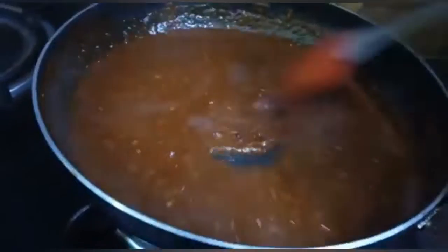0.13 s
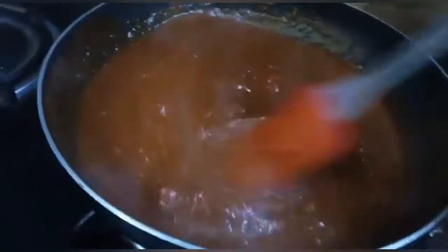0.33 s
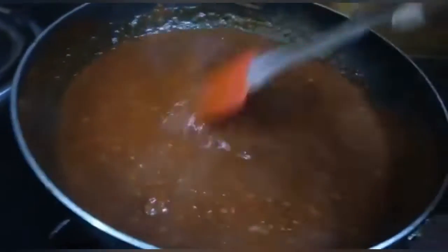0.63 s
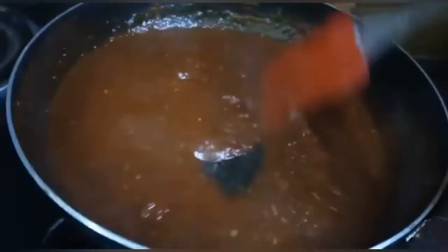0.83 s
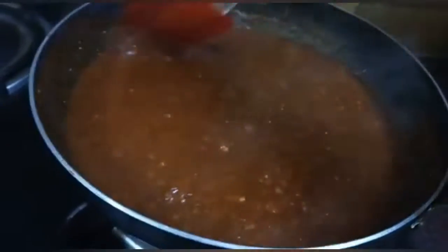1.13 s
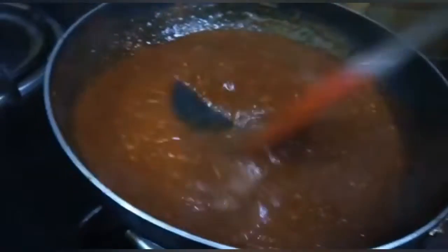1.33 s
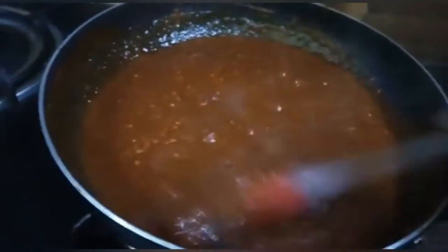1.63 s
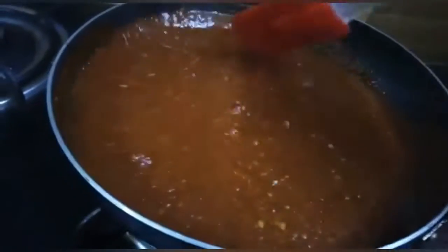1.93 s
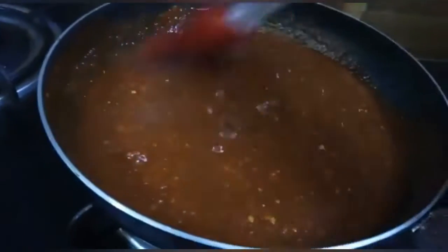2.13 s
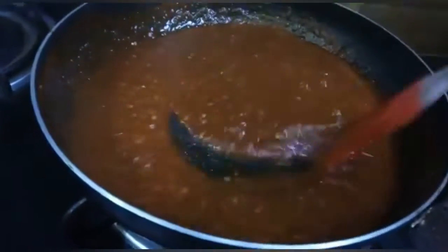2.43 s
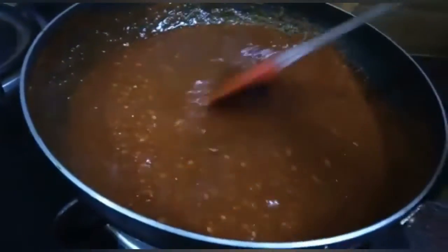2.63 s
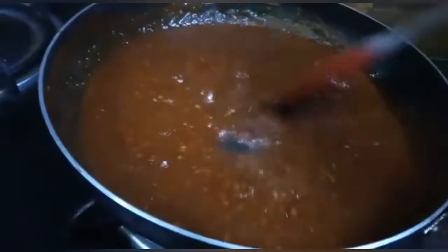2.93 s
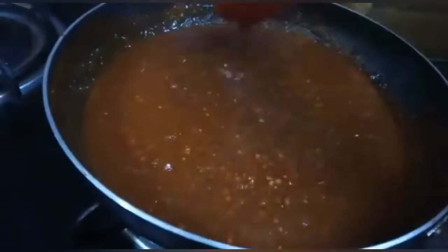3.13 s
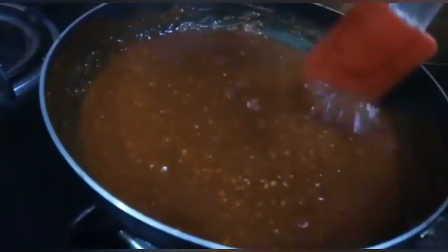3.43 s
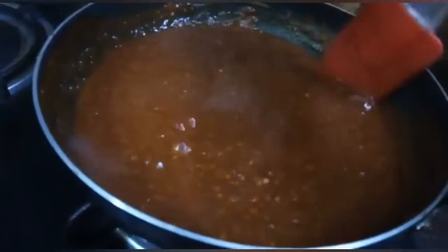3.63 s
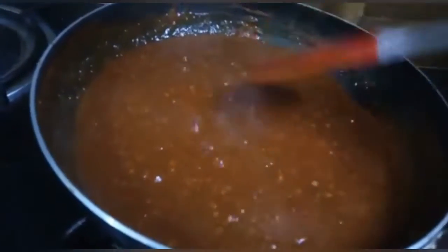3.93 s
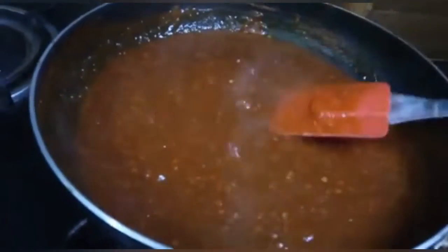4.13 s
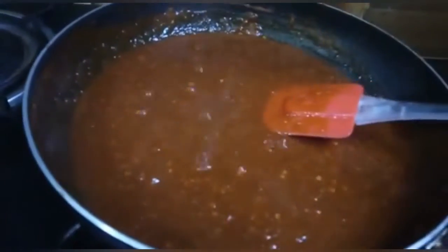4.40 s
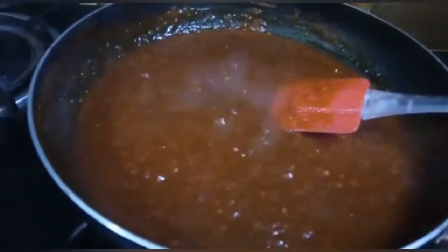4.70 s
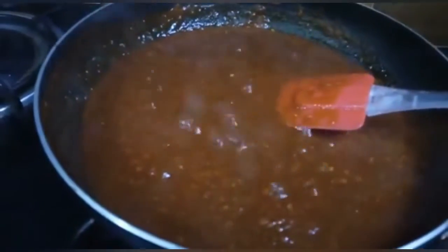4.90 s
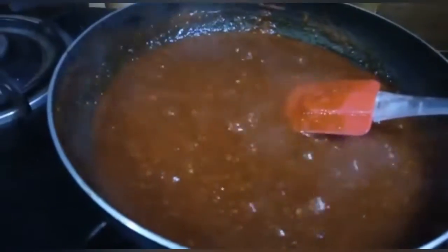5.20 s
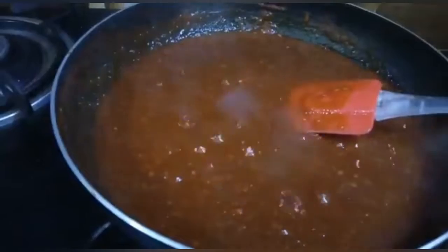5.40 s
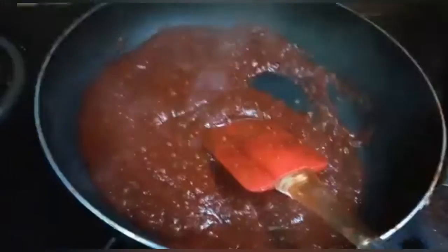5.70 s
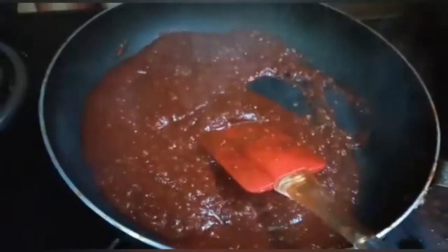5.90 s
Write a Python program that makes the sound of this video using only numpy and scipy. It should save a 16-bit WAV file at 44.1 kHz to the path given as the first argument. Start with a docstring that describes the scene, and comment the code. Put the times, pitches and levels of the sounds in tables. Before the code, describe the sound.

A close, mono, bass-thin sound of cooking with a dull top. Low rubbing rumbles and irregular ringing pan knocks come first, mixed with clumped sizzling and tiny steam squeals. Stirring eases, and the sauce seethes and spits harder, one pop standing out strongly. After an abrupt momentary dropout, the spatula bumps the pan and reduced sauce crackles finely, with a short indoor reflection around everything.

```python
"""Chutney in a frying pan

Thick chutney bubbles and sizzles over a gas flame in a small kitchen: clumped noise bursts over steady hiss.
Brisk spatula strokes rumble and rock the pan, whose ringing modes knock on the burner grate.
Then the spatula rests and the sauce boils and spits, with squealing steam jets and hollow bubble notes.
After a short silence the sauce is heard reduced, with a drier, sparser crackle."""
import sys
import numpy as np
from scipy import signal
from scipy.fft import rfft, irfft
from scipy.io import wavfile

SR = 44100
rng = np.random.default_rng(int(sys.argv[2]) if len(sys.argv) > 2 else 0)


def generate_wav(sig):
    """Save sig (samples, or channels by samples) to the path in sys.argv[1] as 16-bit PCM at SR."""
    pcm = np.round(np.clip(np.atleast_2d(sig).T, -1, 1) * 32767).astype(np.int16)
    wavfile.write(sys.argv[1], SR, pcm)


N = 266893
TIME = np.arange(N) / SR
SILENCE_START_S, SILENCE_END_S = 5.503, 5.579


def from_db(db):
    """Decibels to gain."""
    return 10 ** (np.asarray(db) / 20)


def rms_one(x):
    """Scale to rms 1."""
    return x / np.sqrt(np.mean(x ** 2) + 1e-20)


def at_hz(points, hz):
    """Read a table on a log-frequency axis."""
    table_hz, values = np.transpose(points)
    return np.interp(np.log(hz), np.log(table_hz), values)


def passed(x, hz, kind, order=2):
    """Butterworth filter."""
    return signal.sosfilt(signal.butter(order, hz, kind, fs=SR, output="sos"), x + 1e-18)


def drift(per_s):
    """Smooth chance with spread 1, heading for a new random value per_s times a second."""
    knots = rng.standard_normal(int(per_s * N / SR) + 2)
    return rms_one(np.interp(TIME * per_s, np.arange(len(knots)), knots))


def ring(x, hz, t60):
    """Resonator: a unit click sets a sine of height 1 ringing, 60 dB down after t60 seconds."""
    radius = from_db(-60 / (t60 * SR))
    angle = 2 * np.pi * hz / SR
    return signal.lfilter([0, np.sin(angle)], [1, -2 * radius * np.cos(angle), radius ** 2], x + 1e-18)


def fade(t, t60):
    """Exponential decay, 60 dB down after t60 seconds."""
    return np.exp(-np.log(1000) * t / t60)


def swell(start, end, attack, release):
    """Rise towards start, hold until end, then fall away."""
    before = np.maximum(start - TIME, 0) / attack
    after = np.maximum(TIME - end, 0) / release
    return np.exp(-before ** 2 - after ** 2)


def add(track, s, sound):
    """Mix a sound in at time s."""
    at = max(round(s * SR), 0)
    track[at:at + len(sound)] += sound[:N - at]


def thirds(spectrum):
    """Third-octave bands over a spectrum: (low edge, high edge, centre, gain)."""
    half_band = 2 ** (1 / 6)
    centres = 1000 * 2 ** (np.arange(-15, 10) / 3)
    inside = centres[(centres >= spectrum[0][0]) & (centres <= spectrum[-1][0] * half_band)]
    return [(hz / half_band, hz * half_band, hz, from_db(at_hz(spectrum, hz))) for hz in inside]


def coloured_noise(spectrum, t, t60s=None):
    """Noise of rms 1 in bands, each dying at its own pace if decay times are given."""
    out = 0
    for low, high, hz, gain in thirds(spectrum):
        band = gain * passed(rng.standard_normal(len(t)), [low, high], "band")
        if t60s is not None:
            band = band * fade(t, at_hz(t60s, hz))
        out = out + band
    return rms_one(out)


def coloured(x, spectrum, size=2048):
    """Give a sound a spectrum through a causal (minimum-phase) filter."""
    hz = np.fft.rfftfreq(size, 1 / SR) + 1   # +1 keeps the logarithm finite
    cepstrum = irfft(np.log(from_db(at_hz(spectrum, hz))))
    # folding the cepstrum forward makes the filter minimum-phase
    cepstrum[1:size // 2] *= 2
    cepstrum[size // 2 + 1:] = 0
    return signal.fftconvolve(x, irfft(np.exp(rfft(cepstrum))))[:len(x)]


def gas_flame(level_db=-71.5):
    """The burning gas is turbulent: steady coloured noise."""
    # colour of the flame: (frequency [Hz], relative level [dB per Hz])
    flame_colour = [(40, -5.5), (100, 0), (180, 0), (300, -11.5), (800, -8), (2500, -7.5), (8000, -25.5)]
    return from_db(level_db) * coloured_noise(flame_colour, TIME)


def drag(boom_hz=106):
    """Rubbing shakes the pan and keeps the stove top booming at its lowest mode; the boil does so faintly."""
    # spells of stirring: (start [s], end [s], rumble level [dB])
    stirs = [(0, 0.363, -59.5), (0.696, 0.994, -66), (1.186, 1.33, -64.5), (1.614, 1.921, -60),
             (2.38, 2.723, -70), (5.597, 5.64, -68)]
    # colour of the rumble: (frequency [Hz], relative level [dB per Hz])
    rumble_colour = [(30, -31.5), (60, -10.5), (105, -5), (140, -6), (185, 5.5), (240, -15.5), (330, 4.5),
                     (600, -20), (1200, -18)]
    attack_s, release_s = .05, 0.052
    resting = from_db(-76.5)   # the boil alone shakes the pan
    stirring_boom_db, resting_boom_db = -.5, -9.5   # relative to the rumble

    spells = [from_db(db) * swell(start, end, attack_s, release_s) for start, end, db in stirs]
    stirring = np.max(spells, axis=0)
    rumble = np.hypot(stirring, resting) * coloured_noise(rumble_colour, TIME)

    boom = rms_one(ring(rng.standard_normal(N), boom_hz, t60=.45))
    full_pan = TIME < SILENCE_START_S   # stirring the reduced sauce adds no boom
    stirring_boom = from_db(stirring_boom_db) * stirring * full_pan
    resting_boom = from_db(resting_boom_db) * resting
    return rumble + (stirring_boom + resting_boom) * boom


def tear(hz, width, t60):
    """A film of sauce rips: a brief rush of air, loudest around the pitch of its cavity."""
    t = TIME[:SR // 20]
    edges = [hz / (1 + width), min(hz * (1 + width), SR / 3)]
    return passed(rng.standard_normal(len(t)) * fade(t, t60), edges, "band", order=1)


def bursts(per_s, spectrum, low_hz, high_hz, width, top_t60, spread_db, count=200):
    """Steam pockets burst in clumps, a few large among many small, each dealt one of many random tears."""
    clump_db = 3.3   # spread of the burst rate around per_s
    chance = rng.random(N)
    born = np.flatnonzero(chance < per_s * from_db(clump_db * drift(70)) / SR)

    size = np.minimum(rng.exponential(1, N), 3.6)
    sign = rng.choice([-1, 1], N)
    heights = from_db(spread_db * size) * sign / np.sqrt(per_s)   # a faster rate is no louder by itself

    shapes = []
    for hz in np.geomspace(low_hz, high_hz, count):
        t60 = top_t60 * (high_hz / hz) ** 0.32   # lower cavities last longer
        shapes.append(np.sqrt(hz) * rms_one(tear(hz, width, t60)))
    dealt = rng.integers(0, count, N)

    out = np.zeros(N)
    for i in born:
        add(out, i / SR, heights[i] * shapes[dealt[i]])
    return rms_one(coloured(out, spectrum))


def sauce(bubbling_trim_db=-0.5, sizzle_trim_db=1.0):
    """Large pockets burst in the depth of the sauce, tiny ones fizz at its edge; reduced sauce mostly crackles."""
    # vigour of the boil, which lulls where fresh sauce covers the hot metal:
    # (time [s], bubbling level before trim [dB], sizzle level before trim [dB])
    boil = [(0, -54, -61.5), (.22, -61, -73), (.42, -55.5, -58.5), (.85, -63, -68.5), (1.05, -63.5, -64),
            (1.5, -60.5, -62), (1.7, -54, -57.5), (1.93, -58.5, -60), (2.02, -70.5, -68), (2.13, -62, -60),
            (2.7, -57, -60.5), (2.96, -58.5, -60.5), (3.08, -71, -66), (3.15, -58.5, -60.5),
            (3.75, -59, -60), (4.1, -58.5, -58), (4.85, -54.5, -56), (5.5, -57, -57)]
    # a raft of bubbles collapses in one surge: (time [s], peak level before trims [dB])
    surges = [(1.123, -59), (1.196, -57), (2.08, -56), (2.234, -53.5), (2.445, -55), (2.514, -54),
              (2.885, -60.5), (3.214, -57.5), (3.35, -55.5), (3.544, -57.5), (3.664, -50), (3.83, -49),
              (3.99, -52), (4.166, -54), (4.27, -58), (4.441, -55), (4.601, -54), (4.92, -53),
              (5.06, -56.5), (5.169, -58), (5.28, -54), (5.385, -52.5), (5.598, -52), (5.69, -53),
              (5.77, -52), (5.91, -55), (5.975, -55)]
    # colours of the bursts, the last for reduced sauce: (frequency [Hz], relative level [dB per Hz])
    bubbling_colour = [(120, -30.5), (260, -16), (370, 1.5), (520, -7), (800, 3.5), (1000, -0.5), (1250, 3),
                       (1800, -4), (2500, 1), (3300, -8.5), (4500, -16.5), (8000, -14.5)]
    sizzle_colour = [(1000, -24), (2000, -18), (3000, -14), (4000, -3.5), (5200, 0.5), (6600, 3),
                     (8000, -5.5)]
    crackle_colour = [(600, -18), (1500, -13), (2300, -3), (3000, -4.5), (4200, 2.5), (5500, 3), (8000, -2)]
    surge_attack_s, surge_release_s, surge_sizzle_db = 0.016, 0.038, -3
    pops_per_s, fizz_per_s, rate_at_db = 1200, 1504, -55   # rates at that bubbling level, before clumping
    rate_follows = .4   # share of the bubbling level's swing that the rates follow
    reduced_db, reduced_per_s = -59, 700   # crackle between surges
    dies_db_per_s = 166   # the bubbling, once the sauce is reduced

    boil_s, bubbling_db, sizzle_db = np.transpose(boil)
    bubbling = np.interp(TIME, boil_s, bubbling_db)
    sizzle = np.interp(TIME, boil_s, sizzle_db)
    rate = from_db(rate_follows * (bubbling - rate_at_db))
    surge = sum(from_db(db) * swell(s, s, surge_attack_s, surge_release_s) for s, db in surges)

    pops = bursts(pops_per_s * rate, bubbling_colour, low_hz=460, high_hz=3480,
                  width=1.2, top_t60=0.0079, spread_db=5.0)
    fizz = bursts(fizz_per_s * rate, sizzle_colour, low_hz=2800, high_hz=6750,
                  width=0.19, top_t60=0.0082, spread_db=5.5)
    crackle = bursts(reduced_per_s, crackle_colour, low_hz=1850, high_hz=6900,
                     width=0.42, top_t60=0.003, spread_db=4.5)

    drying_db = dies_db_per_s * np.maximum(TIME - SILENCE_END_S, 0)
    pops = pops * np.hypot(from_db(bubbling), surge) * from_db(bubbling_trim_db - drying_db)
    sizzle_surge = from_db(surge_sizzle_db) * surge
    fizz = fizz * np.hypot(from_db(sizzle), sizzle_surge) * from_db(sizzle_trim_db)
    crackle = crackle * np.hypot(from_db(reduced_db), surge)
    return pops + np.where(TIME < SILENCE_END_S, fizz, crackle)


def knocks(modes_db=-6.5, grate_db=-5.5, crack_db=13.0, click_db=17.0, thud_hz=640, tick_hz=3300):
    """Iron meets the pan, which touches down a second time; soft landings thud, hard ones clang and tick."""
    # pan knocks on the grate: (time [s], thud gain [dB], clang gain [dB], tick gain [dB], second contact delay
    # [s], second contact relative level [dB])
    landings = [(0.0923, -33.5, -38, -36, 0.024, -7.5), (0.2604, -35.5, -33.5, -37, 0.0083, -8.5),
                (0.4593, -32, -41, -35.5, 0.0086, 0.5), (0.6719, -37, -36.5, -39, 0.0089, -6.5),
                (0.8961, -34.5, -49, -43, 0.021, -4.5), (1.3061, -45, -60.5, -55, 0.023, -8.5),
                (1.5597, -34.5, -30.5, -32, .014, -7), (1.7830, -35, -45.5, -42, 0.02, -5.5),
                (2.3168, -46, -82, -73, 0.022, -4)]
    # modes of the pan on the stove: (frequency before loading [Hz], relative level [dB], t60 [s])
    pan_modes = [(106.9, -5.5, 0.71), (185, -5.5, 0.4), (252, -0.5, 0.032), (295.2, 7, 0.11),
                 (322.8, -3.5, 0.32), (432, -2.5, 0.089), (612, 2, 0.25), (740, -1.5, 0.12),
                 (983, 7, 0.095), (1102, -7.5, 0.077), (1194, -2.5, 0.18), (1303, -7.5, 0.071),
                 (1388, 6.5, 0.038), (1540, -2.5, 0.18), (2030, -20, 0.14), (2244, -12, 0.2),
                 (2449, 4.5, 0.049), (2660, -4, 0.11), (2700, -3, 0.1), (2930, -7, 0.18), (3425, -18, 0.14),
                 (4570, -15.5, 0.047), (5810, 3.5, 0.041)]
    # dense ring of the grate and hob: (frequency [Hz], relative level [dB per Hz])
    grate_colour = [(63, -15.5), (160, -1), (290, 9.5), (440, -4.5), (520, -3), (700, -4), (1000, -3.5),
                    (1800, -16.5), (2500, -12), (4200, -26), (6000, -17), (8000, -28.5)]
    # its decay: (frequency [Hz], t60 [s])
    grate_t60s = [(80, 0.54), (210, 0.12), (560, 0.24), (1470, 0.25), (3880, 0.34), (7500, 0.16)]

    out, t = np.zeros(N), TIME[:SR]
    for s, thud, clang, tick, after, second_contact_db in landings:
        # the sauce lies differently at every knock and loads each mode a little differently
        loads = 1 + 0.0034 * rng.standard_normal(len(pan_modes))
        rings = np.array([from_db(db) * np.sin(2 * np.pi * hz * load * t) * fade(t, t60)
                          for (hz, db, t60), load in zip(pan_modes, loads)])
        # the second contact carries little of the pan's weight
        for delay, contact_db, weight in ((0, 0, 1), (after, second_contact_db, .35)):
            strengths = from_db(rng.normal(0, 1, len(pan_modes))) * rng.choice([-1, 1], len(pan_modes))
            modes = strengths @ rings
            click = from_db(click_db) * np.cos(2 * np.pi * tick_hz * t) * fade(t, 0.000099)
            scrape = passed(rng.standard_normal(len(t)), [450, 4000], "band", order=1)
            crack = from_db(crack_db) * scrape * fade(t, .022)
            grate = coloured_noise(grate_colour, t, grate_t60s) * np.sqrt(.045)   # rms about 1 over 20 ms
            hit = from_db(modes_db) * modes + from_db(grate_db) * grate + crack + click

            low = weight * from_db(thud) * passed(hit, thud_hz, "low")
            middle = from_db(clang) * passed(hit, [thud_hz, tick_hz], "band")
            high = from_db(tick) * passed(hit, tick_hz, "high")
            # the middle is flipped so that neighbouring bands do not cancel where they cross
            add(out, s + delay, from_db(contact_db) * (low - middle + high))
    return out


def jets(waver=0.013, flutter_hz=210, flutter=0.52, hiss_db=-2.5):
    """Steam forces a narrow way out from under the sauce, whose edge flutters: a rough squeal plus hiss."""
    # wet sauce meets bare hot metal and a steam jet squeals:
    # (time [s], squeal level before its envelope [dB], nominal length [s], mean pitch [Hz])
    squeals = [(0.145, -49.5, 0.017, 4980), (0.545, -49.5, 0.016, 5280), (2.434, -54.5, 0.024, 5340),
               (2.575, -46.5, 0.037, 5070), (2.838, -48.5, 0.019, 5170), (2.859, -48, 0.02, 4870),
               (2.981, -48.5, 0.019, 4750), (2.988, -54, 0.036, 5240)]
    out, t = np.zeros(N), TIME[:SR // 5]
    opening = 1 + flutter * np.sin(2 * np.pi * flutter_hz * t)
    for s, db, length, hz in squeals:
        age = t / length
        pitch = hz * (1 + waver * drift(900)[:len(age)])
        squeal = rms_one(opening * np.sin(2 * np.pi * np.cumsum(pitch) / SR))
        hiss = rms_one(passed(rng.standard_normal(len(age)), [4600, 7200], "band"))
        envelope = np.minimum(age * 5, 1) * np.exp(-age ** 4)
        add(out, s, from_db(db) * (squeal + from_db(hiss_db) * hiss) * envelope)
    return out


def spits(width=0.45, spray_db=-6.5, spray_t60=0.031, low_hz=550):
    """A big bubble snaps open and a longer, fine spray sounds with it."""
    # single loud spits: (time [s], peak level [dB], centre [Hz])
    loud_spits = [(1.001, -37.5, 970), (1.0432, -38.5, 1000), (1.165, -41, 2350), (1.194, -36, 1470),
                  (1.215, -38, 1600), (1.4634, -40, 6020), (1.657, -30, 2400), (1.7031, -25, 6000),
                  (1.9758, -39, 6800), (2.522, -33, 2690), (2.793, -37.5, 2380), (2.897, -33, 2560),
                  (3.282, -31, 2500), (3.356, -37, 1580), (3.4265, -37, 1100), (3.546, -40.5, 1970),
                  (3.653, -38.5, 885), (3.673, -31.5, 3000), (4.011, -23.5, 1500), (4.44, -42.5, 1400),
                  (4.7653, -32.5, 6100), (4.8235, -31.5, 1210), (4.927, -34.5, 1450), (4.977, -35, 1650),
                  (5.08, -39, 1090), (5.3652, -38.5, 1900), (5.477, -37, 1450), (5.703, -41.5, 4300),
                  (5.760, -41, 4670), (5.851, -36, 4340), (5.8886, -35.5, 4500), (5.927, -38, 3580),
                  (5.971, -41.5, 2250)]
    out = np.zeros(N)
    for s, peak_db, hz in loud_spits:
        snap = tear(hz, width, t60=.007)
        spray = from_db(spray_db) * tear(hz, width, spray_t60)
        pop = passed(snap + spray, low_hz, "high")
        add(out, s, from_db(peak_db) * pop / np.abs(pop).max())
    return out


def plops(rise=0.36):
    """The note of an opening bubble climbs a little as its cavity shrinks."""
    # big slow bubbles open with a hollow note: (time [s], peak level [dB], starting pitch [Hz], t60 [s])
    hollow_notes = [(3.377, -47, 592, 0.055), (3.424, -35.5, 1190, 0.027), (3.507, -53, 436, 0.096),
                    (4.011, -48, 548, 0.12), (4.195, -55, 540, 0.46), (4.285, -60, 537, 0.29)]
    out, t = np.zeros(N), TIME[:SR // 4]
    for s, db, hz, t60 in hollow_notes:
        cycles = hz * t * (1 + rise * t)   # pitch climbs by 2 * rise of itself per second
        add(out, s, from_db(db) * np.sin(2 * np.pi * cycles) * fade(t, t60))
    return out


def bumps():
    """The rubber blade lands on the metal with a short, dull thump: a fading, coloured noise burst."""
    # the spatula bumps softly on the pan bottom: (time [s], peak level [dB], t60 [s])
    soft_bumps = [(4.01, -50, 0.25), (5.612, -57, 0.13), (5.64, -38, 0.057)]
    # colour of the thump: (frequency [Hz], relative level [dB])
    thump_colour = [(90, -10), (175, 11), (260, 2), (420, 1), (640, -1.5), (1000, -24), (2500, -16.5)]
    out, t = np.zeros(N), TIME[:SR // 3]
    for s, peak_db, t60 in soft_bumps:
        thump = coloured(rng.standard_normal(len(t)) * fade(t, t60), thump_colour)
        add(out, s, from_db(peak_db) * thump / np.abs(thump).max())
    return out


def kitchen(x, wet_db=-15.5, wall_hz=6000, t60=0.4):
    """Close, hard walls add a short diffuse tail: fading noise, dulled above wall_hz."""
    t = TIME[:SR // 2]
    tail = passed(rng.standard_normal(len(t)), wall_hz, "low", order=1)
    tail = tail * fade(t, t60) * (t > .004)   # 4 ms before the first reflection
    return x + from_db(wet_db) * signal.fftconvolve(x, tail / np.linalg.norm(tail))[:N]


def scene():
    """Everything sounds from the pan, close to the microphone; the flame hisses below."""
    cooking = kitchen(sauce() + jets() + spits() + plops())
    mix = gas_flame() + drag() + cooking + knocks() + bumps()
    return mix[None]   # one channel


def record(dry, bass_hz=60, cutoff_hz=7650):
    """The microphone is thin in the bass and rounds the hardest peaks; sound drops out briefly; top is cut."""
    running = (TIME < SILENCE_START_S) | (TIME > SILENCE_END_S)
    thin = passed(dry, bass_hz, "high", order=3) * running
    rounded = .18 * np.tanh(thin / .18)
    steep_cut = signal.ellip(8, .5, 65, cutoff_hz, fs=SR, output="sos")
    return signal.sosfilt(steep_cut, rounded)


dry = scene()
out = record(dry)
generate_wav(out)
```